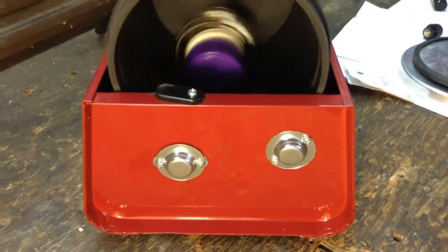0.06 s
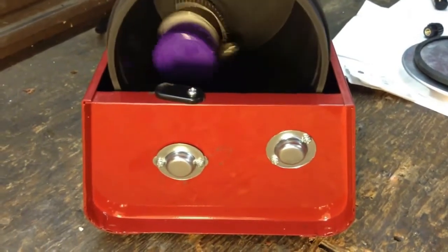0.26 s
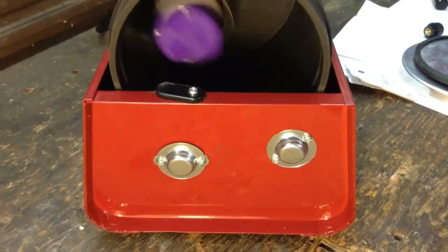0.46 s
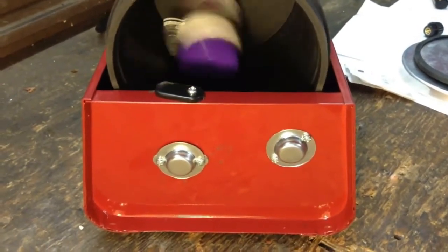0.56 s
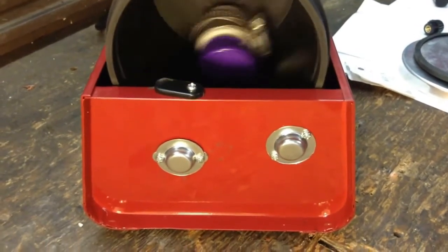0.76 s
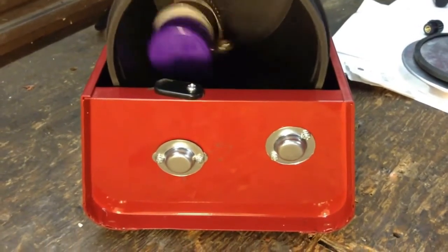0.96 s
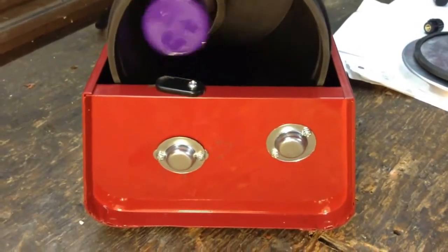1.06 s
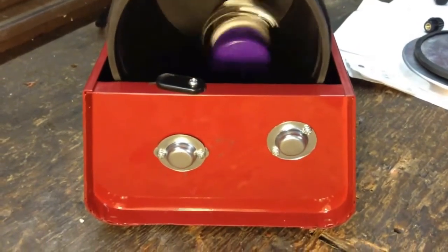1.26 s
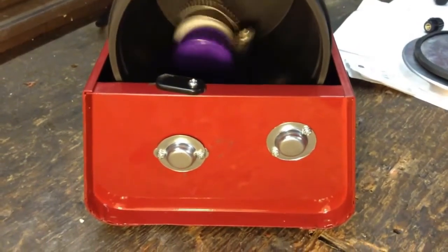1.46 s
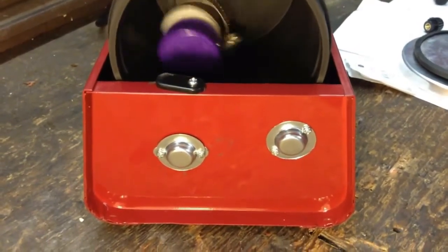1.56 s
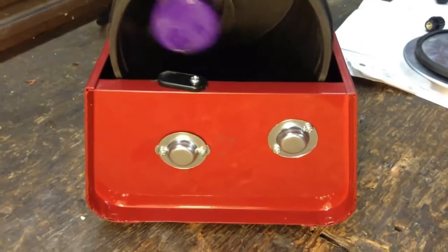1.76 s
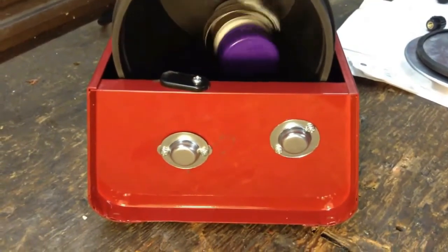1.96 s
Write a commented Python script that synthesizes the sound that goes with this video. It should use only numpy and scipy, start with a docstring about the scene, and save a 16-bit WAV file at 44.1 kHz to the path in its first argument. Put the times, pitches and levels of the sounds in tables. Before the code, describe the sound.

Hardware clatters inside a small turning drum, heard up close in a small room. Three rounds of sharp knocks and metallic clinks come with hollow thumps, each dying into a light rattle over a faint motor hum.

```python
"""Hardware tumbling in a small drum

A hard piece with loose metal fittings tumbles in a motor-driven drum on a workbench. About every
0.63 s it rides up the wall and falls: a run of bright clacks and clinks, hollow thuds from the drum,
then a dying rattle as it rolls and settles. The motor hums faintly underneath, in a small room."""
import sys
import numpy as np
from scipy import signal
from scipy.fft import rfft, irfft
from scipy.io import wavfile

SR = 44100
rng = np.random.default_rng(int(sys.argv[2]) if len(sys.argv) > 2 else 0)


def transcribe(u):
    """Save the signal u as a 16-bit wav file named by the first command-line argument.

    u: samples, shape (n,) or (channels, n), limited to [-1, 1]; the rate is SR.
    q: integer samples, one column per channel.
    """
    v = np.clip(np.atleast_2d(u).T, -1, 1)
    q = np.round(v * 32767).astype(np.int16)
    wavfile.write(sys.argv[1], SR, q)


N = 88200
TIME = np.arange(N) / SR
AGE = np.arange(SR // 6) / SR  # seconds since a hit

# Hard hits on the wall. Each row: start in seconds, level in dB, clank trim in dB, tick trim in dB.
WALL_HITS = [(0.043, -21.5, -4, -5), (0.1108, -21.5, -20, -21), (0.144, -33, -2, 17.5),
             (0.2002, -21, -11, -12), (0.2177, -11, -0.5, -2), (0.232, -5.5, -3, 1), (0.237, -0.5, -5, -6),
             (0.2432, -5, -14, -5), (0.2664, -2, -3, -0.5), (0.2868, 2.5, 0.5, -2.5),
             (0.2955, 2.5, 0.5, -4), (0.3028, 0, 2.5, -0.5), (0.3152, 0, 3.5, -2), (0.325, -0.5, -22, -24),
             (0.3366, -8.5, 4, -14), (0.357, -21, -10, -2), (0.3804, -22, -15, -2), (0.41, -9, -4.5, -10),
             (0.4323, -3.5, -7, -5), (0.44, -10, -8, -2), (0.449, -2, 0.5, -1.5), (0.458, -6, -7, -7),
             (0.4916, -11, -15, -13), (0.504, -6, -10, -26), (0.5137, -5.5, -25, -20),
             (0.5325, -4, -15, -9), (0.5377, -9, 1, 0), (0.5465, -4, -1, -6), (0.5593, -2, -11.5, -9),
             (0.5716, -14.5, 10, -5), (0.6147, -8.5, -7, -4), (0.641, -9, -3, -1), (0.694, -26, 13, -26),
             (0.738, -16, 0, -24), (0.7753, -20.5, 0, -17), (0.845, -7.5, 0, -1.5), (0.8783, -1, -2, -2),
             (0.885, -6.5, 5, -1.5), (0.896, -5, -2, -10), (0.901, -13, 4.5, 3), (0.9248, -11, -7, 1),
             (0.9356, 0.5, 2, 3.5), (0.9461, 0.5, -25, -6), (0.959, -8, -4, 0), (0.9652, -0.5, -16, -10),
             (0.9743, -3.5, -13, -12), (1.0054, -3, -8, -13), (1.017, -9.5, 4.5, -2),
             (1.024, -4, -7.5, -2.5), (1.039, -3.5, -5, -3.5), (1.05, -15, 6.5, -6),
             (1.0629, -7.5, -6, -19), (1.07, -6, -3, -20), (1.094, -13, 2, -12), (1.108, -11, -12, 4),
             (1.1239, -7, -11, -5), (1.1412, -7, -10, -8), (1.1715, -28, -6, -11), (1.183, -11, -1, -5),
             (1.2055, -9, -9, -6), (1.228, -15, -1, -18), (1.237, -19.5, 2, -4.5), (1.299, -18, -7.5, -6.5),
             (1.4265, -17.5, -3, -8), (1.482, -12.5, 0, -2.5), (1.5092, -3, -15, 2.5),
             (1.5103, -1, -3, -6.5), (1.54, -8, 1.5, -1), (1.565, -7, 2, -4), (1.573, -2, -1.5, 3),
             (1.579, 4, -9.5, -4), (1.596, -6, -27, -8), (1.6314, -5, -0.5, -6), (1.64, -3.5, -1, -2),
             (1.6517, -8, -1, 2.5), (1.6575, -1.5, -14, -5), (1.665, -11.5, -15, 10), (1.68, -5, -4.5, -3),
             (1.6844, 0, -8, -3.5), (1.6969, 0, -9, -9), (1.7045, -6.5, -3, -6), (1.7198, -12, 0, -17),
             (1.7357, -21, 8, -15), (1.766, -10, -7, -10), (1.8161, -12.5, -2, -2.5),
             (1.8247, -16.5, -3, -13), (1.847, -23, 11, -21), (1.8652, -17.5, 3, 6),
             (1.87, -14.5, 1.5, -15), (1.8806, -28, -19, -8), (1.899, -15.5, 0.5, -7), (1.9479, -27, 7, 13),
             (1.9654, -19.5, 1, -1.5)]
# The crack of a hit, a crowd of short-lived modes. Each row: frequency in Hz, relative level in dB.
CRACK_SPECTRUM = [(150, -39.5), (400, -9), (650, -8.5), (800, -21.5), (1000, -11.5), (1300, -11.5),
                  (1550, -2.5), (1800, 10), (2150, -3), (2450, -1.5), (2700, 0), (2950, -13.5), (3250, 1),
                  (3700, -2), (4150, -5.5), (4600, -3), (5500, -7), (6200, -9.5), (7200, -7), (8500, -10.5),
                  (11000, -9), (13000, -13), (15500, -17)]
# The ring of fittings and wall. Each row: pitch in Hz, relative level in dB, 60 dB decay in seconds.
RING_MODES = [(1713, -13, 0.042), (1759, -20, 0.12), (1816, -14, 0.11), (1887, -14.5, 0.063),
              (1965, -27, 0.017), (2243, -17, 0.066), (2675, -17, 0.08), (3175, -24.5, 0.16),
              (3216, -15.5, 0.038), (3442, -19, 0.073), (3753, -11.5, 0.03), (3910, -17.5, 0.06),
              (4480, -25.5, 0.067), (4790, -14, 0.037), (5590, -13.5, 0.038)]
# Fittings swinging free. Each row: start in seconds, pitch in Hz, level in dB.
CLINK_NOTES = [(0.044, 3800, -41.5), (0.112, 3760, -36), (0.145, 1750, -43.5), (0.201, 4690, -36),
               (0.268, 2675, -13), (0.3275, 3367, -12.5), (0.435, 2730, -23), (0.54, 1833, -18.5),
               (0.56, 2760, -27), (0.616, 2610, -23), (0.738, 3306, -34.5), (0.878, 4480, -17.5),
               (0.886, 1760, -32), (0.947, 3250, -23), (1.022, 2690, -29), (1.094, 3430, -21.5),
               (1.124, 3590, -25.5), (1.205, 3300, -50), (1.236, 2675, -30), (1.36, 4720, -40.5),
               (1.51, 1965, -19.5), (1.509, 4457, -20), (1.581, 3300, -13.5), (1.631, 1734, -21.5),
               (1.683, 2710, -32), (1.697, 3460, -19), (1.735, 3490, -21)]
# The fader curve of the loose rattle. Each row: time in seconds, level in dB.
RATTLE_CURVE = [(0, -41), (0.07, -55.5), (0.11, -40.5), (0.18, -46), (0.24, -24), (0.31, -19.5),
                (0.385, -27), (0.45, -23.5), (0.56, -22.5), (0.68, -34.5), (0.76, -34), (0.835, -52),
                (0.87, -34), (0.95, -25.5), (0.99, -26), (1.04, -24), (1.12, -25.5), (1.16, -29),
                (1.24, -36), (1.29, -49.5), (1.34, -44), (1.365, -40), (1.40, -44), (1.47, -44),
                (1.53, -36.5), (1.58, -21.5), (1.62, -29), (1.70, -24.5), (1.76, -25), (1.80, -36.5),
                (1.88, -41), (1.93, -39), (2.0, -45)]
# The piece's weight landing. Each row: start in seconds, upper-mode level in dB, lower-mode level in dB.
LANDINGS = [(0.231, -17.5, -33), (0.267, -17.5, -43), (0.289, -24, -36), (0.3095, -12, -10),
            (0.318, -12, -21.5), (0.339, -18, -29), (0.359, -52, -24), (0.4595, -20.5, -26.5),
            (0.483, -24.5, -33), (0.56, -15.5, -18.5), (0.621, -19.5, -44), (0.847, -15.5, -26.5),
            (0.885, -33, -35.5), (0.937, -33, -38), (0.963, -17, -42), (1.04, -25.5, -47),
            (1.124, -38, -40), (1.423, -27.5, -30), (1.491, -21.5, -30), (1.5085, -15.5, -39),
            (1.574, -16, -28), (1.589, -16.5, -20), (1.64, -28, -16.5), (1.654, -16, -30),
            (1.694, -19, -29)]
# The drum's hollow voice. Each row: pitch in Hz, relative level in dB, 60 dB decay in seconds.
HOLLOW_MODES = [(232, -32, 0.15), (365, -12, 0.034), (407, 0.5, 0.047), (448, 1.5, 0.049),
                (517, 0.5, 0.034), (560.6, -4, 0.093), (595, -15, 0.032)]
# The drum's rumble under the rolling piece. Each row: frequency in Hz, relative level in dB.
ROLL_SPECTRUM = [(120, -24.5), (200, -7.5), (300, -8.5), (390, -8), (490, -4.5), (572, -0.5), (660, -3),
                 (900, -19), (1400, -22)]
# The motor's hum. Each row: pitch in Hz, level in dB.
MOTOR_TONES = [(124, -65.5), (198, -62.5), (646, -59), (867, -60.5), (1217, -59), (1346, -67)]
# Motor and bearing noise. Each row: frequency in Hz, relative level in dB.
BEARING_SPECTRUM = [(25, -13), (90, -14), (125, -0.5), (200, 5.5), (290, 2), (600, -1), (1000, -2.5),
                    (1300, 0), (2200, -15), (4600, -6), (6500, -29), (15000, -54)]

BODY_LOW_HZ, BODY_HIGH_HZ = 2200, 6000  # clank lies below the body of a hit, tick above it
CLANK_DB, BODY_DB, TICK_DB = -2, -1.68, -2
CRACK_DB, RING_DB, RING_SPREAD_DB = -9.5, -11.5, 4.5
ATTACK_S = 0.00054  # for clinks and for a contact at 0 dB
SOFT_ATTACK_SLOPE, SOFT_RING_SLOPE = 0.7, 0.25  # gentler contacts ease in and favour ring over crack


def from_db(db):
    """Decibels to gain."""
    return 10 ** (np.asarray(db) / 20)


def decay(t60, age=AGE):
    """An exponential fade that loses 60 dB in t60 seconds."""
    return np.exp(-np.log(1000) * age / t60)


def unit_rms(x):
    """Scale to rms 1."""
    return x / np.sqrt(np.mean(x ** 2) + 1e-20)


def add(out, start_s, sound):
    """Drop a sound onto the track at start_s."""
    i = int(start_s * SR)
    out[i:i + len(sound)] += sound[:N - i]


def noise(spectrum, low_hz=0, high_hz=SR):
    """Noise coloured by a spectrum and kept between two frequencies, at rms 1."""
    hz = np.arange(N // 2 + 1) * SR / N
    points_hz, db = np.transpose(spectrum)
    gain = from_db(np.interp(np.log(hz + 1), np.log(points_hz), db)) * (hz >= low_hz) * (hz < high_hz)
    return unit_rms(irfft(rfft(rng.standard_normal(N)) * gain, N))


def roll_off(x, hz, kind="low"):
    """A gentle first-order low-pass or high-pass."""
    return signal.sosfilt(signal.butter(1, hz, kind, fs=SR, output="sos"), x)


def clacks(bands, rings):
    """The piece and its fittings smack into the drum wall."""
    out = np.zeros(N)
    for start_s, db, clank_db, tick_db in WALL_HITS:
        add(out, start_s, contact(bands, rings, db, clank_db, tick_db, t60=0.033))
    return out


def contact(bands, rings, db, clank_db, tick_db, t60):
    """One hit: a short three-band crack, plus metal modes struck at random strengths and phases."""
    attack_s = ATTACK_S * from_db(-SOFT_ATTACK_SLOPE * db)
    rise = 1 - np.exp(-AGE / attack_s)
    offset = rng.integers(N - len(AGE))
    gains = from_db([CLANK_DB + clank_db, BODY_DB, TICK_DB + tick_db])
    crack = 0
    for band, gain, band_t60 in zip(bands, gains, (t60, t60, 0.89 * t60)):  # the tick dies first
        envelope = rise * decay(band_t60)
        burst = unit_rms(band[offset:offset + len(AGE)] * envelope)
        crack += gain * np.sqrt(np.mean(envelope ** 2)) * burst
    modes = rings[rng.integers(len(rings))]
    tone = np.array([gains[0] if hz < BODY_LOW_HZ else gains[1] for hz, _, _ in RING_MODES])
    strike_db = RING_DB - SOFT_RING_SLOPE * db + RING_SPREAD_DB * rng.standard_normal(len(modes))
    phases = np.exp(2j * np.pi * rng.random(len(modes)))
    ring = rise * ((tone * from_db(strike_db) * phases) @ modes).real
    return from_db(db) * (from_db(CRACK_DB) * crack + ring)


def crack_bands():
    """The crowd of short-lived modes as three bands of noise: clank, body and tick."""
    edges_hz = [20, BODY_LOW_HZ, BODY_HIGH_HZ, 20000]
    return [noise(CRACK_SPECTRUM, low, high) for low, high in zip(edges_hz, edges_hz[1:])]


def metal_ring(detune=0.0052):
    """The metal's modes as fading complex tones; pressing against the wall nudges each pitch."""
    hz, db, t60s = np.transpose(RING_MODES)
    envelopes = from_db(db)[:, None] * np.array([decay(t60) for t60 in t60s])
    pitches = hz * (1 + detune * rng.standard_normal(len(hz)))
    return envelopes * np.exp(2j * np.pi * np.outer(pitches, AGE))


def clinks(t60=0.078, beat_hz=38.6, twin_db=-2.5):
    """A fitting swings free and sings over the clatter, a weaker twin mode beating against its note."""
    out = np.zeros(N)
    envelope = (1 - np.exp(-AGE / ATTACK_S)) * decay(t60)
    for start_s, hz, db in CLINK_NOTES:
        twin_hz = hz + beat_hz * rng.choice([-1, 1])
        twin = from_db(twin_db) * np.sin(2 * np.pi * twin_hz * AGE)
        add(out, start_s, from_db(db) * envelope * (np.sin(2 * np.pi * hz * AGE) + twin))
    return out


def rattle(bands, rings, fader_db, taps_per_s=420, spread_db=3.5, trim_db=-4, spots=32):
    """Light taps at random moments, dealt to spots on the fittings that each have their own sound."""
    onsets = rng.random(N) < taps_per_s / SR
    strengths = from_db(spread_db * np.clip(rng.standard_normal(N), -2, 2))
    taps = unit_rms(onsets * strengths * rng.choice([-1, 1], N)) * from_db(fader_db + trim_db)
    spot_hit = rng.integers(spots, size=N)
    out = np.zeros(N)
    for spot in range(spots):
        voice = contact(bands, rings, db=-18, clank_db=-5, tick_db=3.5, t60=0.023)
        out += signal.fftconvolve(taps * (spot_hit == spot), voice / np.linalg.norm(voice))[:N]
    clump_db = 0.5 * noise(BEARING_SPECTRUM, 2.3, 69.6)  # slight, quick swells: the taps come in clumps
    return rattle_brightness(out * from_db(clump_db), fader_db)


def rattle_brightness(x, fader_db, flat_at_db=-39, slope=0.22):
    """Harder taps are brighter, gentle ones duller: the treble rides the rattle's fader."""
    dull = roll_off(x, hz=5530)
    return dull + (x - dull) * from_db(slope * (fader_db - flat_at_db))


def thuds(trim_db=-2, spread_db=3.2, attack_s=0.0026, split_hz=470):
    """The weight of the piece lands and sets the hollow drum modes ringing."""
    out = np.zeros(N)
    rise = 1 - np.exp(-AGE / attack_s)
    for start_s, upper_db, lower_db in LANDINGS:
        for hz, mode_db, t60 in HOLLOW_MODES:
            landing_db = lower_db if hz < split_hz else upper_db
            gain = from_db(trim_db + mode_db + landing_db + spread_db * rng.standard_normal())
            add(out, start_s, gain * rise * decay(t60) * np.sin(2 * np.pi * hz * AGE))
    return out


def rolling(fader_db, trim_db=-28.5, slope=0.46):
    """The drum rumbles under the rolling piece, swelling with the rattle."""
    return from_db(trim_db + slope * fader_db) * noise(ROLL_SPECTRUM)


def motor(bearing_db=-47, waver_depth=0.49):
    """Wavering motor tones over a bed of bearing noise."""
    out = from_db(bearing_db) * noise(BEARING_SPECTRUM)
    for hz, db in MOTOR_TONES:
        waver = 1 + waver_depth * noise(BEARING_SPECTRUM, 1, 15)
        out += from_db(db) * np.sqrt(2) * waver * np.sin(2 * np.pi * (hz * TIME + rng.random()))
    return out


def room(x, wet_db=-14, t60=0.14, predelay_s=0.006):
    """Close walls return a short, slightly dull tail of reflections."""
    age = TIME[:SR // 2]
    tail = rng.standard_normal(len(age)) * decay(t60, age) * (age > predelay_s)
    tail = roll_off(tail, hz=9100)
    return from_db(wet_db) * signal.fftconvolve(x, tail / np.linalg.norm(tail))[:N]


def scene():
    """The mono mix: the tumbling piece and its reflections, over the motor."""
    bands = crack_bands()
    rings = [metal_ring() for _ in range(8)]  # eight ways of lying against the wall
    fader_db = np.interp(TIME, *np.transpose(RATTLE_CURVE))
    rumble = rolling(fader_db)
    drum = clacks(bands, rings) + clinks() + rattle(bands, rings, fader_db) + thuds() + rumble
    drum = roll_off(drum, hz=157, kind="high")  # the drum's sounds are thinned below about 150 Hz
    return (drum + room(drum) + motor())[None]


def record(dry, ceiling=0.88, cutoff_hz=15550):
    """Clip the tallest peaks, then cut the very top with a steep low-pass."""
    top_cut = signal.ellip(12, 0.1, 80, cutoff_hz, fs=SR, output="sos")
    return signal.sosfilt(top_cut, np.clip(dry, -ceiling, ceiling))


dry = scene()
out = record(dry)
transcribe(out)
```